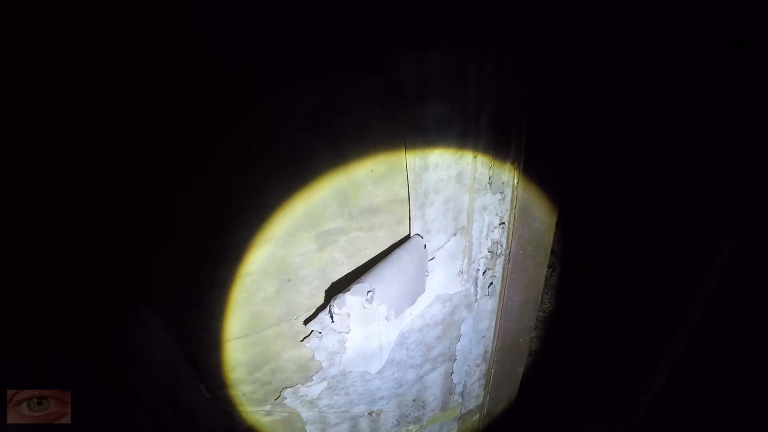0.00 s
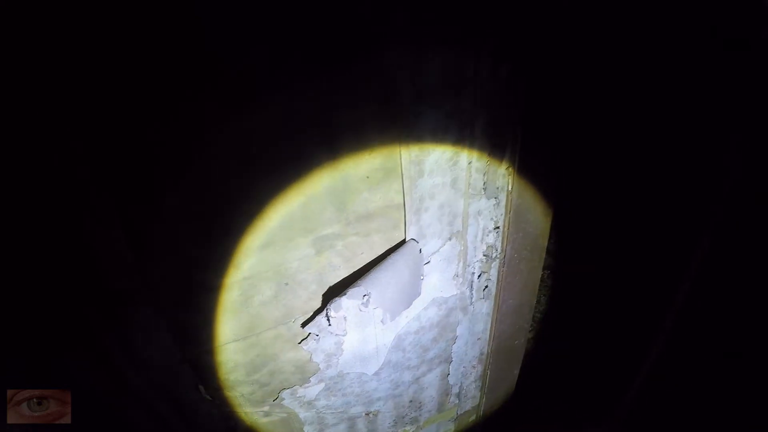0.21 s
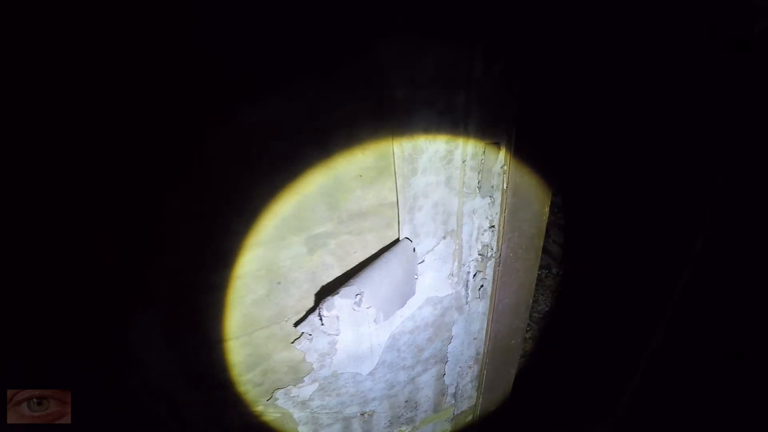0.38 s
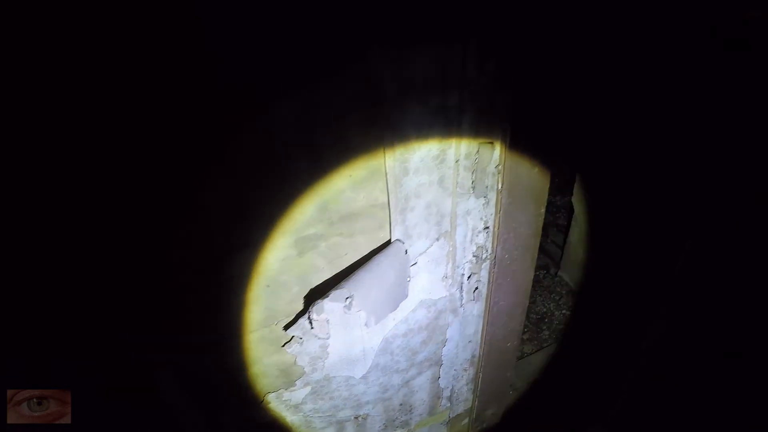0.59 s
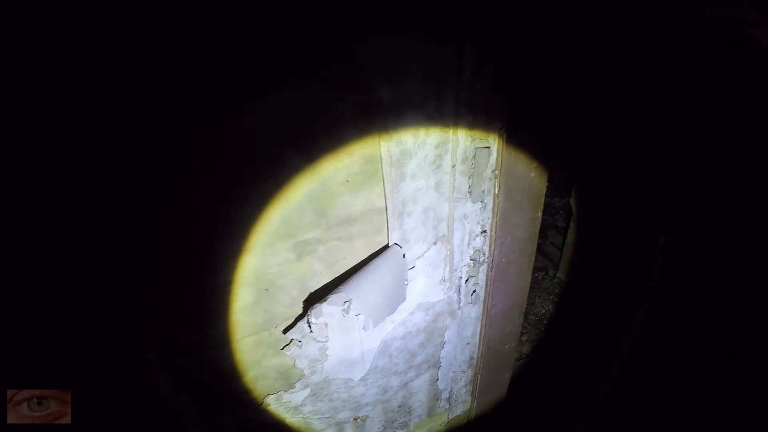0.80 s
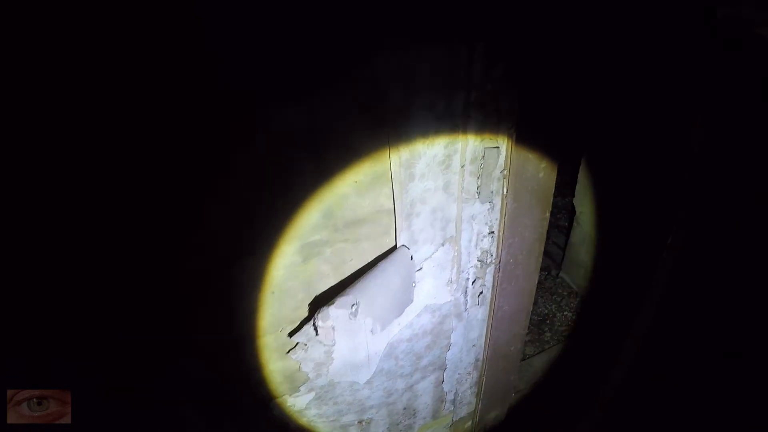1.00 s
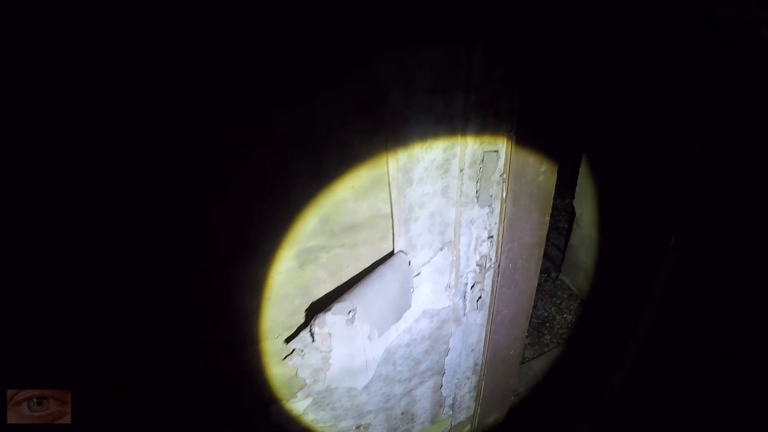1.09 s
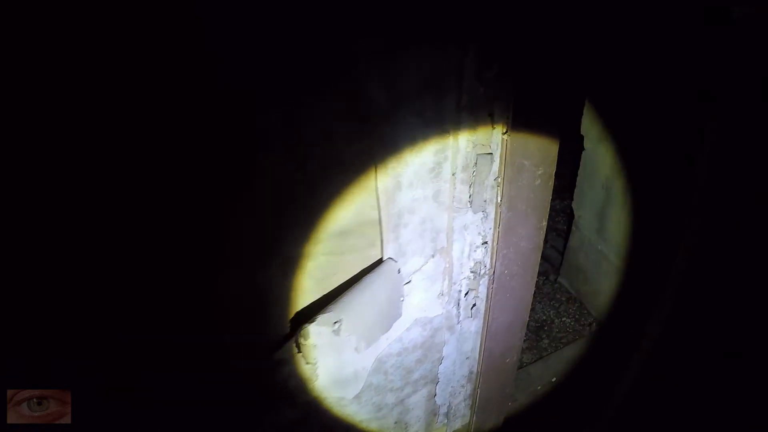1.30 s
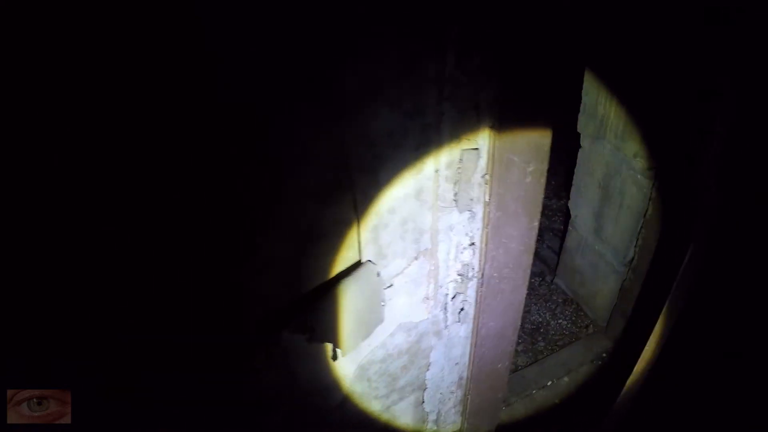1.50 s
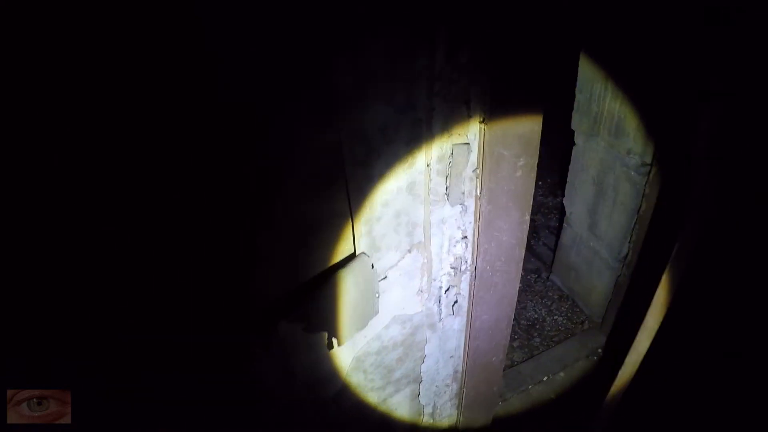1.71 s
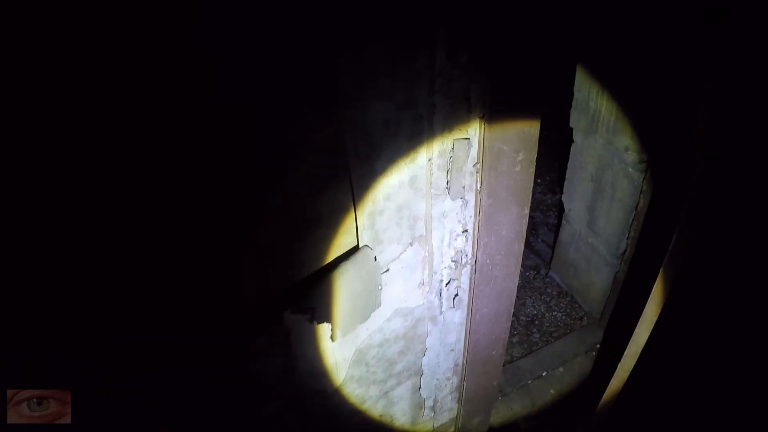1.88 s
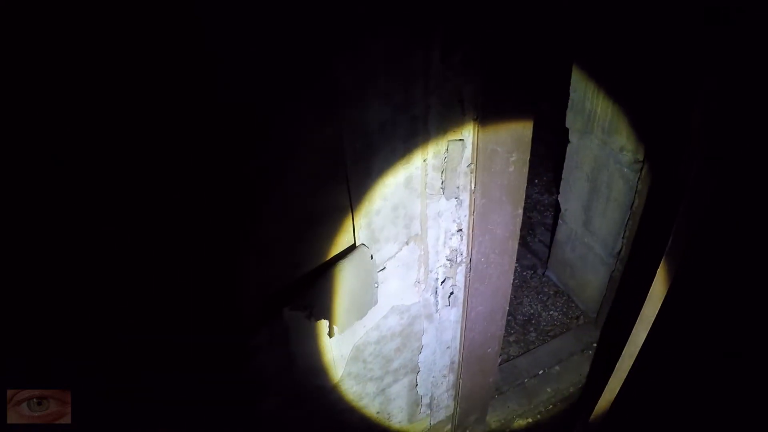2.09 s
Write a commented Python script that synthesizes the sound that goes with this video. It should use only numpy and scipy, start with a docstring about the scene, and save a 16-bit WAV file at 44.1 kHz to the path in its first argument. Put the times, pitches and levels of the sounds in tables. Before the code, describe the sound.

A jammed wooden door thuds, scrapes and breaks free in a small empty room.

```python
"""A stuck wooden door is shoved open, close up, in a small empty room.
Over a deep rumble, the first shove thuds in the leaf and cracks at the jamb. The edge scrapes over the
frame and the leaf shudders; the hardest shove lands at 0.75 s. The handle clicks and, near 1.25 s, the
door breaks free with a strike on the latch plate. It swings with a faint hinge squeak, bumps, and
drags on softly."""
import sys
import numpy as np
from scipy import signal
from scipy.fft import rfft, irfft
from scipy.io import wavfile

SR = 44100
rng = np.random.default_rng(int(sys.argv[2]) if len(sys.argv) > 2 else 0)


def unload_audio(sound):
    """Save the sound as a 16-bit wav file, at the path given as the first command line argument."""
    columns = np.transpose(np.atleast_2d(sound))
    # keep every value between -1 and 1, then stretch to whole-number steps
    steps = np.round(np.clip(columns, -1, 1) * 32767)
    wavfile.write(sys.argv[1], SR, steps.astype(np.int16))


N = 92610
T = np.arange(N) / SR

# EQ curves of the noise layers. Each row: frequency in Hz, relative level in dB.
AIR_EQ = [(40, 10), (130, -19), (250, 0.5), (450, -2), (1500, -6), (2500, -16), (5000, -13.5), (9000, -22),
          (15000, -25)]
RUMBLE_EQ = [(10, -2), (22, -10.5), (31, 6), (42, -2), (60, -33), (120, -18), (400, -51)]
SHUDDER_EQ = [(20, -15), (40, -5), (56, 4), (75, -0.5), (105, -6.5), (160, -15.5), (195, -15.5), (235, -47),
              (600, -63)]
HISS_EQ = [(500, -46), (2000, -6), (4600, 0.5), (6500, -6.5), (9000, -12), (15000, -14.5)]
RUB_EQ = [(100, 11), (240, -12.5), (400, 4.5), (750, 2), (1300, 2.5), (2200, -1), (4600, -10),
          (6500, -14.5), (9000, -28.5), (15000, -24.5)]
CRACK_EQ = [(60, -4), (200, -0.5), (450, 0), (750, -6), (1200, -6.5), (2000, -4), (3600, -6.5),
            (5000, -10.5), (6500, -18), (9000, -25), (15000, -43.5)]
FRAME_EQ = [(100, -29.5), (400, -8.5), (1100, 0), (2400, -3.5), (4000, -10.5), (8000, -27), (15000, -5)]
# Fader rides of the sustained layers. Each row: time in seconds, level in dB.
RUMBLE_RIDE = [(0, -35.5), (.09, -32), (.17, -41.5), (.3, -29.5), (.8, -30.5), (1.1, -31.5), (1.4, -31),
               (1.61, -37.5), (1.7, -31.5), (1.85, -40), (2.1, -35.5)]
SHUDDER_RIDE = [(.13, -62), (.22, -45.5), (.31, -21.5), (.49, -23), (.59, -29), (.8, -25), (.92, -25.5),
                (1.05, -38.5), (1.2, -33), (1.33, -23.5), (1.47, -45), (1.75, -51), (2.1, -38.5)]
HISS_RIDE = [(.29, -75), (.34, -44.5), (.48, -43.5), (.56, -50.5), (.72, -44.5), (.84, -49), (.93, -50),
             (1.03, -56.5), (1.16, -51.5), (1.23, -56), (1.28, -92), (1.7, -67), (1.82, -53.5),
             (2.1, -53.5)]
RUB_RIDE = [(0, -55.5), (.22, -54.5), (.32, -37.5), (.365, -39.5), (.48, -33), (.54, -38.5), (.63, -36.5),
            (.71, -33), (.76, -33), (.84, -45), (.96, -55), (1.08, -51), (1.17, -43.5), (1.23, -30),
            (1.30, -52.5), (1.72, -58), (1.82, -51.5), (1.92, -53), (2.1, -46.5)]
# The hinge's glide. Each row: time in seconds, pitch in Hz, level in dB.
SQUEAK_GLIDE = [(1.31, 1410, -54), (1.385, 1375, -59.5), (1.56, 1358, -61.5), (1.66, 1360, -58),
                (1.74, 1314, -74)]
# Thin, high scratches. Each row: start in seconds, centre in Hz, level in dB, 60 dB decay in seconds.
EDGE_SCRATCHES = [(.733, 8550, -37, 0.092), (1.138, 11100, -51, .08), (1.157, 14300, -55, 0.052)]
# How each part rings. Each row: pitch in Hz, relative level in dB, 60 dB decay in seconds.
LEAF_MODES = [(162, 0, .28), (241, -4, .14), (329, 1, .2), (363, -2, .15), (439, -4, .18), (503, -5, .17),
              (555, -6, .16), (654, -7, .13), (1215, -6, .11), (1543, -1, .11), (2085, -2, .09),
              (2352, -5, .09), (3180, 1, .07), (3335, 3, .08), (3593, 3, .08), (4025, 1, .08),
              (4380, -3, .07), (4700, -2, .07), (4880, -1, .07)]
HANDLE_MODES = [(839, 5.5, 0.036), (1022, 2.5, 0.065), (3860, -5, 0.032), (4880, -1, .04),
                (4940, 4.5, 0.035), (5560, 5.5, 0.029), (6500, -7.5, 0.05)]
LATCH_MODES = [(2450, -5, .07), (3140, 1, .04), (3770, -1, .05), (7150, -19, .16), (10700, -18, .04),
               (13350, -27, .07)]
# Hits on those parts. Each row: start in seconds, level in dB, treble tilt in dB per octave.
LEAF_BLOWS = [(0.228, -35, -1.5), (0.654, -40.5, -1.5), (.753, -20.5, 0.63), (1.249, -49, 1.5)]
HANDLE_CLICKS = [(1.145, -36, -8), (1.184, -34, 0.5), (1.214, -41, 1)]
LATCH_STRIKES = [(0.757, -30.5, 10.5), (1.252, -28.5, -9.5)]
# Wood cracking against wood. Each row: start in seconds, level in dB, attack in seconds,
# 60 dB decay in seconds, treble tilt in dB per octave.
JAMB_CRACKS = [(0.224, -20.5, 0.0032, 0.047, -7.5), (0.229, -25.5, 0.0011, 0.086, -0.6),
               (0.238, -21.5, .003, 0.14, -2), (0.253, -29, 0.0017, 0.15, -3),
               (.354, -31, 0.0045, 0.044, -2), (0.488, -32.5, 0.0015, 0.08, -4.5),
               (0.579, -34.5, 0.00079, 0.067, 1), (0.652, -24, 0.0067, .16, -9.5),
               (0.692, -28.5, 0.0051, 0.084, -1), (0.749, -8.5, 0.0006, 0.017, -1.5),
               (0.7502, -9, 0.0068, 0.09, 0.03), (.98, -46.5, 0.0036, 0.13, 7.5),
               (1.143, -40.5, 0.00074, 0.11, -1.5), (1.18, -34.5, 0.0012, 0.094, -1),
               (1.198, -37, 0.0032, 0.095, 1.5), (1.216, -30.5, 0.0019, 0.046, 1.5),
               (1.238, -24, .002, 0.023, -2), (1.250, -30, 0.00068, .05, -2),
               (1.566, -53, 0.0018, 0.12, 15), (1.801, -41.5, .001, 0.055, -0.5),
               (2.065, -37, 0.00052, 0.074, -0.5), (2.096, -30, 0.0021, 0.093, -2)]
# Thuds of the leaf. Each row: start in seconds, pitch in Hz, level in dB, attack in seconds,
# 60 dB decay in seconds.
LEAF_THUDS = [(0.2307, 160, -1.5, 0.016, 0.036), (0.228, 99.5, -5.5, .02, 0.069),
              (.265, 51.6, -9, 0.017, 0.061), (0.652, 136.3, -9.5, 0.021, 0.25),
              (0.656, 200.5, -19, 0.017, 0.38), (0.7537, 99.2, 1.5, 0.004, 0.1),
              (.785, 157.4, -14, 0.0068, 0.2), (1.236, 77.5, -5, .013, 0.056),
              (1.26, 200, -28, 0.0074, .16), (1.266, 96.5, -14, 0.0046, 0.062),
              (1.324, 61.6, -23.5, 0.0075, 0.17), (1.793, 209, -46, 0.011, 0.34),
              (1.797, 96, -37, 0.017, 0.18), (2.047, 87, -19, 0.0079, 0.1)]


def amp(db):
    """Decibels to gain."""
    return 10 ** (np.asarray(db) / 20)


def unit(x):
    """Scale to a standard deviation of 1."""
    return x / (np.std(x) + 1e-12)


def curve(rows, column=1):
    """Join one column of a table by straight lines in time."""
    rows = np.array(rows)
    return np.interp(T, rows[:, 0], rows[:, column])


def convolve(x, response):
    """Pass a sound through a response."""
    return signal.fftconvolve(x, response)[:N]


def eq(x, points, tilt_db=0):
    """Minimum-phase EQ of unit power through (Hz, dB) points, tilted per octave above 300 Hz."""
    size = 16384
    hz, db = np.array(points, float).T
    octave = np.log2(np.maximum(np.fft.rfftfreq(size, 1 / SR), 1))
    gain_db = np.interp(octave, np.log2(hz), db) + tilt_db * np.maximum(octave - np.log2(300), 0)
    cepstrum = irfft(np.log(amp(gain_db)))
    cepstrum[1:size // 2] *= 2
    cepstrum[size // 2 + 1:] = 0
    response = irfft(np.exp(rfft(cepstrum)))
    return convolve(x, response / np.linalg.norm(response))


def wobble(rate_hz):
    """Smooth random modulation with a spread near 1."""
    return np.interp(T * rate_hz, np.arange(N // 20), rng.standard_normal(N // 20))


def grains(per_second, spread_db):
    """A dense texture of tiny, uneven slips."""
    happens = rng.random(N) < per_second / SR
    polarity = np.sign(rng.standard_normal(N))
    return unit(happens * polarity * amp(spread_db * rng.standard_normal(N)))


def burst(start, attack, t60):
    """Envelope with a smooth attack and an exponential decay; times in seconds."""
    age = T - start
    rise = np.sin(np.pi / 2 * np.clip(age / attack, 0, 1)) ** 2
    return rise * np.exp(-np.log(1000) * np.maximum(age - attack, 0) / t60)


def ring(modes, start=0, tilt_db=0):
    """Struck modes die away, wavering as if beating; each hit has its own treble tilt."""
    age = np.maximum(T - start, 0)
    out = np.zeros(N)
    for hz, db, t60 in modes:
        gain = amp(db + tilt_db * np.log2(hz / modes[0][0]))
        decay = np.exp(-np.log(1000) * age / t60)
        beating = 1 + 0.5 * wobble(rate_hz=110)
        out += gain * decay * np.sin(2 * np.pi * hz * age) * beating
    return out


def low_noise(ride, points, top_hz):
    """Bass noise, compressed to an even body, following a fader ride."""
    wave = signal.hilbert(unit(eq(rng.standard_normal(N), points)))
    even = wave.real / np.sqrt(np.abs(wave) ** 2 + 1)
    lowpass = signal.butter(4, top_hz, fs=SR, output="sos")
    return unit(signal.sosfilt(lowpass, even)) * amp(curve(ride))


def air():
    """A quiet, steady bed of room tone."""
    return amp(-56) * eq(rng.standard_normal(N), AIR_EQ)


def room(x):
    """Bare walls add a short tail, strongest in the bass."""
    out = x
    for band, t60, db in (("low", 0.34, -14.5), ("high", 0.52, -28)):
        tail = rng.standard_normal(N) * burst(start=0.006, attack=0.03, t60=t60)
        crossover = signal.butter(2, 450, band, fs=SR, output="sos")
        out = out + amp(db) * convolve(x, signal.sosfilt(crossover, tail / np.linalg.norm(tail)))
    return out


def frame(x):
    """The jamb and the wall around it ring on briefly in many dense modes."""
    tail = eq(rng.standard_normal(N), FRAME_EQ) * burst(start=0, attack=0.013, t60=0.096)
    return x + amp(-19) * convolve(x, tail / np.linalg.norm(tail))


def rumble():
    """Movement lays a deep rumble under the scene."""
    return low_noise(RUMBLE_RIDE, RUMBLE_EQ, top_hz=62.4)


def shudder():
    """The dragging leaf shudders in the low end."""
    return low_noise(SHUDDER_RIDE, SHUDDER_EQ, top_hz=236)


def hinge():
    """A thin, rough squeak sags in pitch while the door swings."""
    hz = curve(SQUEAK_GLIDE) * (1 + 0.0196 * wobble(rate_hz=250))
    level_db = curve(SQUEAK_GLIDE, column=2) + 3.9 * wobble(rate_hz=41.2)
    gate = (T > SQUEAK_GLIDE[0][0]) & (T < SQUEAK_GLIDE[-1][0])
    return gate * amp(level_db) * np.sin(2 * np.pi * np.cumsum(hz) / SR)


def scratches():
    """Brief narrow-band squeals as the edge slips."""
    out = np.zeros(N)
    for start, hz, db, t60 in EDGE_SCRATCHES:
        squeal = wobble(rate_hz=1000) * np.cos(2 * np.pi * hz * T)
        out += amp(db) * burst(start, attack=0.0036, t60=t60) * squeal
    return out


def scrape():
    """The edge rubs unevenly over the frame, with a fine dry hiss on top."""
    force = amp(curve(RUB_RIDE) + 1.5 * wobble(rate_hz=70))
    hiss = amp(curve(HISS_RIDE)) * eq(rng.standard_normal(N), HISS_EQ)
    slips = grains(per_second=5000, spread_db=1.5)
    return eq(slips * force, RUB_EQ) + hiss


def leaf(contact):
    """Contact noise rings the panels, adding a woody body."""
    response = ring(LEAF_MODES)
    return contact + amp(-20) * convolve(contact, response / np.linalg.norm(response))


def knocks():
    """Hits on the leaf, the handle and the latch plate ring each in its own modes."""
    parts = (LEAF_MODES, LEAF_BLOWS), (HANDLE_MODES, HANDLE_CLICKS), (LATCH_MODES, LATCH_STRIKES)
    return sum(amp(db) * ring(modes, start, tilt) for modes, hits in parts for start, db, tilt in hits)


def cracks():
    """The bite of a shove: short avalanches of slips as the wood gives."""
    slips = grains(per_second=3500, spread_db=1.5)
    return sum(amp(db) * eq(slips * burst(start, attack, t60), CRACK_EQ, tilt)
               for start, db, attack, t60, tilt in JAMB_CRACKS)


def thuds():
    """The weight of a shove: the leaf bends, at a pitch set by where the door is held."""
    return sum(amp(db) * burst(start, attack, t60) * np.sin(2 * np.pi * hz * (T - start))
               for start, hz, db, attack, t60 in LEAF_THUDS)


def scene():
    """Mono mix: the door in its room, with the low end, the squeak and the air left dry."""
    contact = knocks() + scratches() + leaf(cracks() + scrape())
    door = room(thuds() + frame(contact))
    bed = shudder() + rumble() + air()
    return (door + bed + hinge())[None]


def record(dry):
    """Soft-clip the loudest peaks and cut the very top."""
    ceiling, top_hz = 0.92, 15500
    rounded = dry / (1 + (dry / ceiling) ** 6) ** (1 / 6)
    lowpass = signal.ellip(10, 0.2, 80, top_hz, fs=SR, output="sos")
    return signal.sosfilt(lowpass, rounded)


dry = scene()
out = record(dry)
unload_audio(out)
```